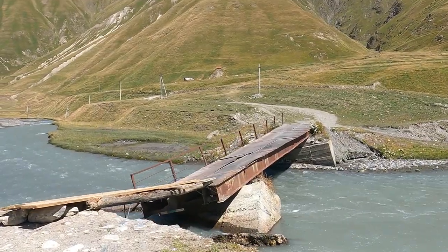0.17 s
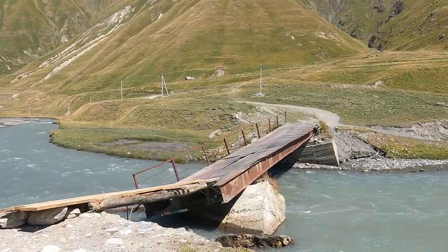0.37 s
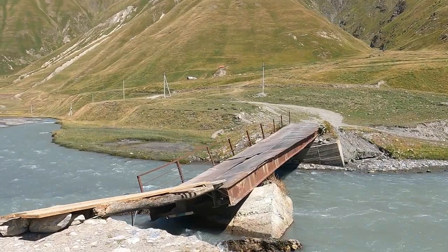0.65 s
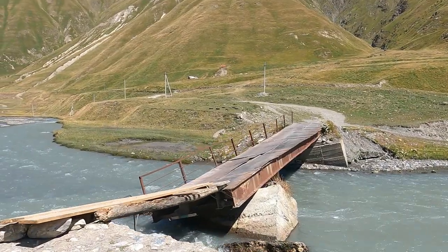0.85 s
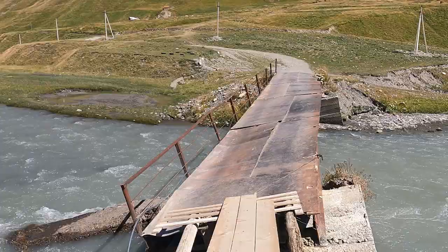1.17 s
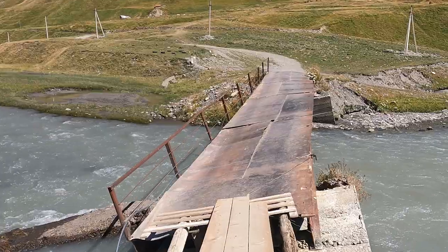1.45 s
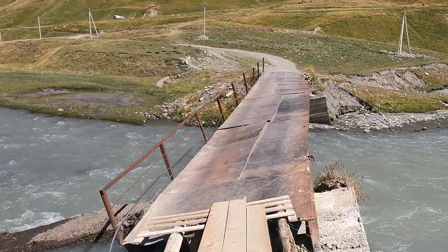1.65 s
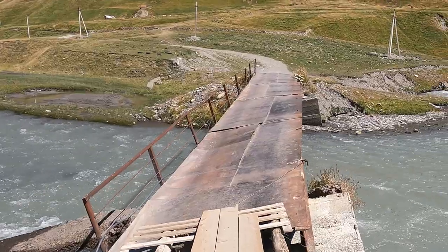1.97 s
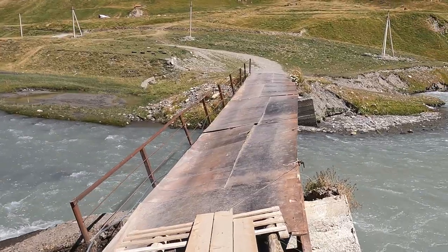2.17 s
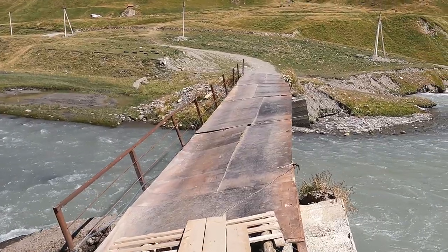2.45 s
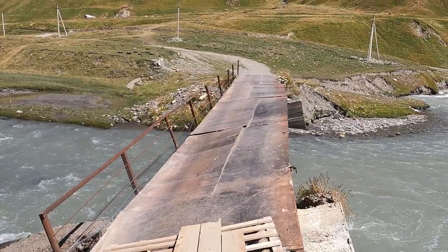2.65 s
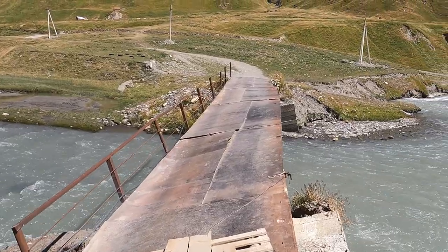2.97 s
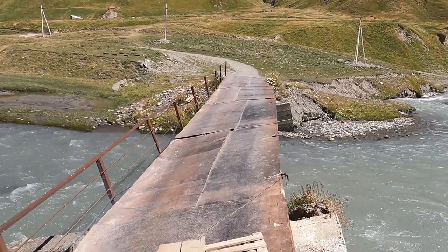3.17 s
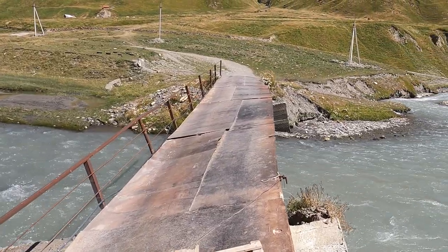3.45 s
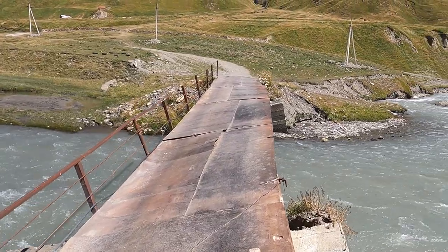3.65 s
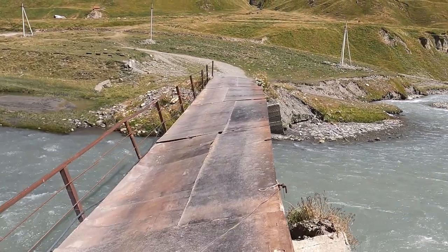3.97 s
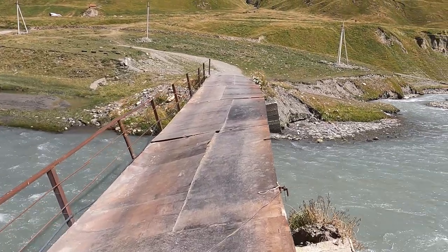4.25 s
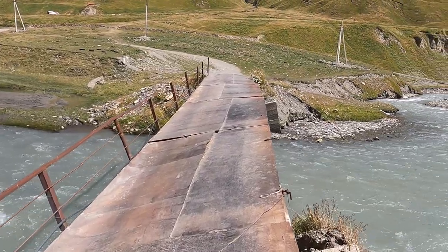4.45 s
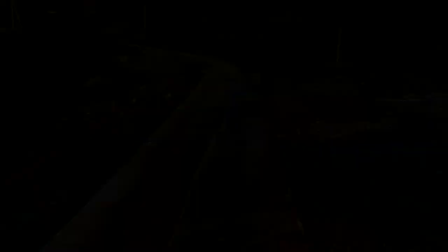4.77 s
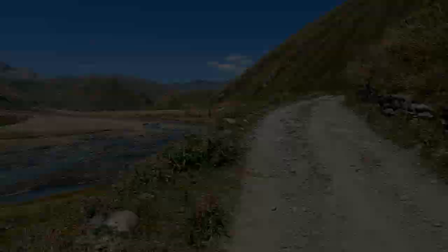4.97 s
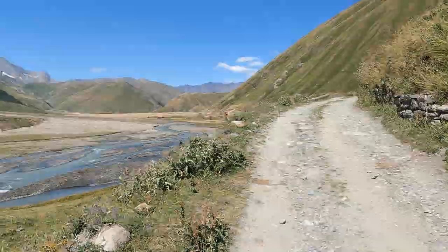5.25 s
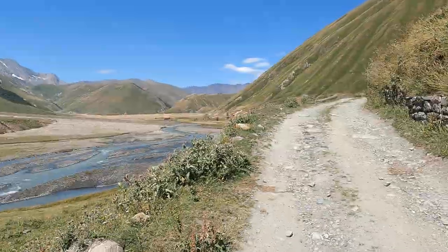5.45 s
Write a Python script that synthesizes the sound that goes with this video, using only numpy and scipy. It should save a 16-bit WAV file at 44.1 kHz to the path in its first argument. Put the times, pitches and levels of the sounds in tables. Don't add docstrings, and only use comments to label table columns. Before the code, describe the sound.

Rushing mountain water and buffeting wind, suddenly closer and brighter on a bridge, dip to silence before a quiet road with a crunch underfoot.

```python
import sys
import numpy as np
from scipy import signal
from scipy.fft import irfft
from scipy.io import wavfile
from scipy.ndimage import uniform_filter1d

SR = 44100
rng = np.random.default_rng(int(sys.argv[2]) if len(sys.argv) > 2 else 0)


def to_linear_factor(level_db):
    exponent = np.asarray(level_db, float) / 20
    return 10 ** exponent


def master(y):
    cut = np.clip(np.atleast_2d(y).T, -1, 1)
    pcm = np.round(cut * 32767)
    wavfile.write(sys.argv[1], SR, pcm.astype(np.int16))


N = 246959

JOIN_S, ROAD_S = 1.2052, 4.92

# f/Hz, density level/dB
BANK_COLOUR = [(210, -30), (350, -2), (480, -9), (670, 1.5), (840, -5), (1300, -5.5), (2460, -11.5),
               (3300, -17.5), (4270, -19), (6230, -41), (8200, -50), (9640, -47.5), (11300, -58),
               (15000, -71)]
BRIDGE_COLOUR = [(100, -40), (250, 5.5), (500, -1), (800, 2.5), (2130, -4.5), (2500, -6.5), (3700, -11.5),
                 (6000, -26), (8500, -39), (9700, -41), (11300, -50), (15000, -56.5)]
ROAD_COLOUR = [(200, -5), (330, -3), (450, -12.5), (600, -6.5), (1000, -8.5), (1860, -12.5), (2500, -15),
               (3800, -25), (4700, -31.5), (6000, -38.5), (11300, -53), (15000, -69)]
# t/s, level/dB
SWELL = [
    [(0, 0), (.25, 0.5), (.8, 1), (1.0, 0), (1.2, 2.5)],
    [(1.21, -1.5), (1.7, 0.35), (2.2, 0.2), (2.8, 0.2), (3.2, -0.4), (3.6, 0), (4.1, 0.6), (4.55, 0.37)],
    [(4.92, 13.5), (5.42, -3), (5.5, -1), (5.6, 1)],
]
# t/s, level/dB
BREEZE = [
    [(0, -21.5), (.2, -27), (.3, -30), (.5, -24), (.9, -24.5), (1.2, -29.5)],
    [(1.21, -20.5), (1.9, -32.5), (2.4, -29.5), (2.9, -29), (3.2, -21.5), (3.7, -21), (4.55, -23)],
    [(4.92, -48), (5.2, -40.5), (5.3, -41), (5.42, -55), (5.6, -53)],
]
# centre t/s, length/s, rumble change/dB, flutter change/dB
GUSTS = [(0.09, 0.15, 4.5, 2), (0.15, 0.024, -11, -16), (0.2, 0.055, 6.5, -8), (0.314, 0.087, -1, 7.5),
         (0.474, .06, -4, 2.5), (0.57, 0.069, 4.5, 9), (0.774, 0.11, 7.5, -3.5), (0.96, 0.12, -3, -4),
         (1.1, 0.072, 3, 2), (1.165, 0.062, -12, -4), (1.27, 0.14, -1.5, 0), (1.5, 0.49, 0, 5.5),
         (1.733, 0.033, 1.5, -9), (1.92, 0.16, 6.5, 10), (2.25, 0.18, -2.5, 5.5), (2.49, 0.033, -9, 11.5),
         (2.65, 0.057, -1.5, 2), (2.802, 0.027, -1.5, 12.5), (3.005, 0.12, 5, 2.5), (3.11, 0.13, -5.5, -1),
         (3.227, 0.051, -3.5, 0), (3.307, .05, -5, -5.5), (3.669, 0.13, -0.5, 5.5), (3.9, 0.077, 0.5, -3),
         (4.114, 0.25, 0.5, -3), (4.378, 0.098, 1.5, 10), (5.17, 0.18, 12.5, -15), (5.35, 0.048, -3, -6)]
# t/s, peak level/dB, length/s, sign
PUFFS = [
    (1.0955, -14.5, 0.0064, 1),
    (1.2075, -10, 0.0046, 1),
    (1.762, -11.5, 0.0075, -1),
    (1.904, -8, 0.0037, -1),
    (3.227, -8.5, 0.0026, 1),
    (5.298, -30, 0.0077, 1),
    (5.343, -36, 0.028, 1),
]
# centre t/s, length/s, level/dB
JETS = [(.58, .08, -35), (1.3, .15, -39), (1.92, .1, -29), (2.8, .08, -26.5), (3.23, .05, -26),
        (3.42, .1, -29.5), (4.124, 0.16, -35.5), (4.38, .25, -24), (4.56, .15, -28.5)]
# t/s, peak level/dB, centre f/Hz, width/Hz, T60/s
SPRAY = [(2.512, -51, 6000, 4040, 0.032), (2.661, -37, 3700, 1005, .04), (2.719, -38.5, 6900, 998, 0.052),
         (2.752, -34.5, 5470, 2500, 0.047), (2.753, -44.5, 10940, 5000, 0.044),
         (2.968, -32, 5900, 2210, 0.027), (3.365, -25, 3960, 1800, 0.12), (3.366, -45, 8500, 5000, 0.18),
         (3.547, -54, 6000, 2930, .03), (4.335, -36, 6000, 4020, 0.077), (2.722, -48.5, 9500, 4010, .9)]
# f/Hz, width/Hz, peak level/dB
RAIL_MODES = [(3140, 270, -19.5), (3920, 600, -25.5), (4570, 500, -27), (5880, 900, -35), (7050, 1210, -36),
              (9500, 1500, -42), (13100, 3500, -47.5)]
# t/s, level/dB, start f/Hz, end f/Hz, length/s
POCKETS = [
    (2.126, -28.5, 2475, 2390, 0.039),
]
# multiple of f, level/dB
OVERTONES = [(1, 0.5), (2, -21), (4, -33.5)]
# t/s, peak level/dB, centre f/Hz, width/Hz, T60/s
GRAVEL = [(5.198, -35, 2600, 2500, .015), (5.250, -17.5, 1740, 2800, 0.0073),
          (5.283, -30, 1200, 2000, 0.024), (5.290, -28, 1490, 2500, 0.032), (5.2915, -31, 606, 700, 0.028),
          (5.2932, -23, 750, 800, 0.027), (5.294, -41, 3500, 1500, 0.038), (5.299, -31.5, 770, 700, 0.026),
          (5.306, -35, 1400, 1500, 0.043), (5.3315, -32, 650, 800, 0.036), (5.335, -36, 1000, 1400, 0.029),
          (5.349, -39, 1000, 1500, 0.013), (5.3765, -28, 1060, 1190, 0.013), (5.283, -39, 5000, 6000, .2)]
# t/s, peak level/dB, centre f/Hz, width/Hz, T60/s
SCUFFS = [
    (5.45, -40.5, 1840, 500, 0.7),
    (5.49, -61, 6760, 1500, .15),
    (5.51, -54, 4700, 900, .3),
]
# f/Hz, level/dB
HOUSING = [(20, 1.5), (2500, 0), (2930, -8), (3500, -0.5), (11300, 2), (11800, -5.5), (12200, -11.5),
           (12600, -1), (14500, -6.5), (15200, -44.5)]
# t/s, level/dB
FADER = [(0, -1.5), (4.535, -1), (4.87, -59), (4.92, -90), (5.0, -61.5), (5.27, -5.5), (5.3, 0.5),
         (5.6, -1.5)]
# t/s, level/dB
CLICKS = [
    (.0005, -25),
    (1.2052, -24.5),
]


def water(swell, treble_swell, level_db, colour, grain_share, patchy_db, flicker_db):
    hz, t, grains = signal.stft(bubbles(), SR, nperseg=512, noverlap=384)
    wash = signal.stft(rng.standard_normal(N), SR, nperseg=512, noverlap=384)[2]
    z = np.sqrt(grain_share) * grains + np.sqrt(1 - grain_share) * wash
    f, db = np.transpose(colour)
    colour_db = np.interp(np.log(hz + 1), np.log(f), db)[:, None]
    norm = np.sqrt(np.mean(to_linear_factor(colour_db) ** 2))
    high = np.clip(np.log2((hz + 1) / 2000) / 2, 0, 1)[:, None]
    gain_db = colour_db + level_db + (1 + treble_swell * high) * curve(swell, t)[0]
    gain_db = gain_db + patchy_db * blotches(len(hz), len(t), tall=6, wide=25)
    gain_db = gain_db + flicker_db * high * blotches(1, len(t), tall=1, wide=5)
    return signal.istft(z * to_linear_factor(gain_db) / norm, SR, nperseg=512, noverlap=384)[1][:N]


def bubbles(per_s=4000, spread_db=1.5, cycles=6):
    size = to_linear_factor(spread_db * np.minimum(rng.exponential(1, N), 5))
    size *= rng.random(N) < per_s / SR
    kind = rng.integers(0, 30, N)
    out = np.zeros(N)
    for k, hz in enumerate(np.geomspace(250, 14000, 30)):
        u = np.arange(int(3 * cycles * SR / hz)) * hz / SR / cycles
        tone = u * np.exp(-2.5 * u) * np.sin(2 * np.pi * cycles * u * (1 + 0.061 * u))
        grain = np.sqrt(hz) * evened(tone) / np.sqrt(len(u))
        out += signal.oaconvolve(size * (kind == k), grain)[:N]
    return evened(out)


def wind(breeze, flutter_db, low_hz, edge_hz, top_hz, lumpy_db):
    push_db = curve(breeze, np.arange(N) / SR)[0]
    rumble_db, sharp_db = gusting()
    rumble = to_linear_factor(push_db + rumble_db) * eddies(low_hz, edge_hz, lumpy_db, 0.082)
    flutter = to_linear_factor(push_db + flutter_db + sharp_db) * eddies(edge_hz, top_hz, lumpy_db, 0.13)
    return band(rumble + flutter, 21, 1100)


def gusting():
    centre_s, length_s, *change_db = np.transpose(GUSTS)
    t = np.arange(0, N + 100, 100) / SR
    bells = np.exp(-(2 * (t[:, None] - centre_s) / length_s) ** 2)
    return [np.interp(np.arange(N) / SR, t, bells @ db) for db in change_db]


def eddies(low_hz, high_hz, lumpy_db, window_s):
    push, lumps = rng.standard_normal((2, N))
    lumps = evened(band(lumps, 11, 40))
    x = band(push, low_hz, high_hz) * to_linear_factor(lumpy_db * lumps)
    x = band(x, low_hz / 2, high_hz * 2)
    hann = signal.windows.hann(int(window_s * SR))
    power = abs(signal.oaconvolve(x ** 2, hann / hann.sum(), "same"))
    return x / np.sqrt(power + 1e-12)


def puffs():
    out = np.zeros(N)
    for s, db, length_s, sign in PUFFS:
        u = np.arange(-2 * length_s, 2 * length_s, 1 / SR) / (length_s / 2)
        push = (1 - 2 * u ** 2) * np.exp(-2 * u ** 2)
        add(out, s - 2 * length_s, sign * to_linear_factor(db) * push)
    return out


def jets():
    t = np.arange(N) / SR
    passing = sum(to_linear_factor(db) * np.exp(-(2 * (t - s) / length_s) ** 2) for s, length_s, db in JETS)
    return passing * eddies(220, 480, lumpy_db=0, window_s=0.1)


def knocks(events, rise_s, top_hz, snap):
    out, t = np.zeros(N), np.arange(9000) / SR
    for s, db, hz, width_hz, t60_s in events:
        low_hz = np.sqrt(hz ** 2 + width_hz ** 2 / 4) - width_hz / 2
        burst = rng.standard_normal(len(t)) * to_linear_factor(-60 * t / t60_s) * np.minimum(t / rise_s, 1)
        burst[0] = snap
        hit = band(burst, low_hz, low_hz + width_hz, order=3)
        add(out, s, to_linear_factor(db) * hit / abs(hit).max())
    return band(out, 150, top_hz)


def rail():
    strike_s, lag_s_per_octave, t60_s = 2.7085, 0.0019, 0.041
    first_hz = RAIL_MODES[0][0]
    return [(strike_s + lag_s_per_octave * np.log2(hz / first_hz), db, hz, width_hz, t60_s)
            for hz, width_hz, db in RAIL_MODES]


def pockets():
    out = np.zeros(N)
    for s, db, start_hz, end_hz, length_s in POCKETS:
        phase = 2 * np.pi * np.cumsum(np.linspace(start_hz, end_hz, int(length_s * SR))) / SR
        tone = sum(to_linear_factor(part_db) * np.sin(round(k) * phase) for k, part_db in OVERTONES)
        add(out, s, to_linear_factor(db) * tone * signal.windows.tukey(len(phase), 0.5))
    return out


def evened(x):
    return x / np.sqrt(np.mean(x ** 2) + 1e-20)


def curve(rows, t):
    s, *columns = np.transpose(rows)
    return [np.interp(t, s, c) for c in columns]


def add(mix, s, sound):
    part = mix[round(s * SR):][:len(sound)]
    part += sound[:len(part)]


def blotches(rows, columns, tall, wide):
    z = rng.standard_normal((rows, columns))
    z = uniform_filter1d(z, size=tall, axis=0)
    return evened(uniform_filter1d(z, size=wide, axis=1))


def band(x, low_hz, high_hz, order=2):
    return signal.sosfilt(signal.butter(order, [low_hz, high_hz], "band", fs=SR, output="sos"), x)


def scene():
    bank = water(SWELL[0], treble_swell=1.2, level_db=-32, colour=BANK_COLOUR,
                 grain_share=0.22, patchy_db=0.65, flicker_db=0.43)
    bank += wind(BREEZE[0], flutter_db=-8.5, low_hz=21, edge_hz=96, top_hz=244, lumpy_db=2.5)

    bridge = water(SWELL[1], treble_swell=1.2, level_db=-24, colour=BRIDGE_COLOUR,
                   grain_share=0.15, patchy_db=0.95, flicker_db=0.93)
    bridge += wind(BREEZE[1], flutter_db=-5.5, low_hz=24, edge_hz=96, top_hz=215, lumpy_db=1.9)
    bridge += knocks(SPRAY + rail(), rise_s=0.001, top_hz=13000, snap=4.2)
    bridge += pockets()

    road = water(SWELL[2], treble_swell=0.095, level_db=-42.5, colour=ROAD_COLOUR,
                 grain_share=0.16, patchy_db=1.7, flicker_db=1.2)
    road += wind(BREEZE[2], flutter_db=-3.5, low_hz=12, edge_hz=70, top_hz=400, lumpy_db=2.0)
    road += knocks(GRAVEL, rise_s=0.0013, top_hz=3300, snap=5.2)
    road += knocks(SCUFFS, rise_s=0.038, top_hz=9000, snap=0)

    t = np.arange(N) / SR
    joined = np.clip((t - JOIN_S) / 0.002 + 0.5, 0, 1)
    river = (1 - joined) * bank + joined * bridge
    places = np.where(t < ROAD_S, river, road)
    return (places + puffs() + jets())[None]


def band_limit(x):
    return signal.sosfilt(signal.butter(12, 15900, fs=SR, output="sos"), x)


def record(dry):
    f, db = np.transpose(HOUSING)
    hz = np.linspace(0, SR / 2, 513)
    response = to_linear_factor(np.interp(np.log(hz + 1), np.log(f), db))
    taps = np.roll(irfft(response), 512) * signal.windows.hann(1024)
    wet = signal.oaconvolve(dry, taps[None], "same")
    wet *= to_linear_factor(curve(FADER, np.arange(N) / SR)[0])
    for s, click_db in CLICKS:
        wet[:, round(s * SR)] += to_linear_factor(click_db)
    wet += to_linear_factor(-88)
    wet += to_linear_factor(-125) * rng.standard_normal(N)
    return band_limit(wet)


dry = scene()
out = record(dry)
master(out)
```